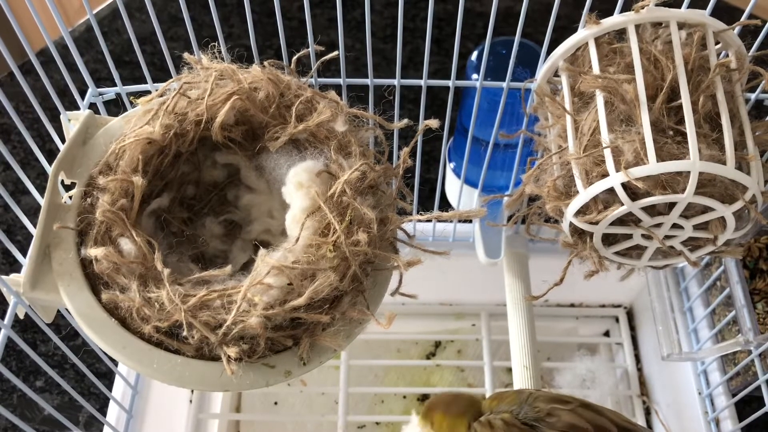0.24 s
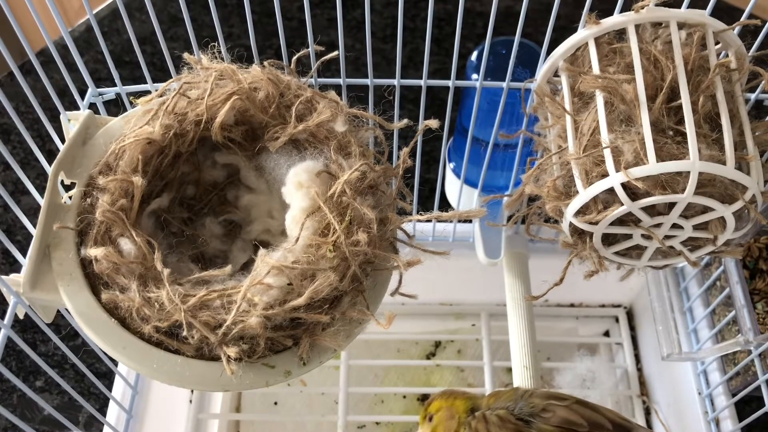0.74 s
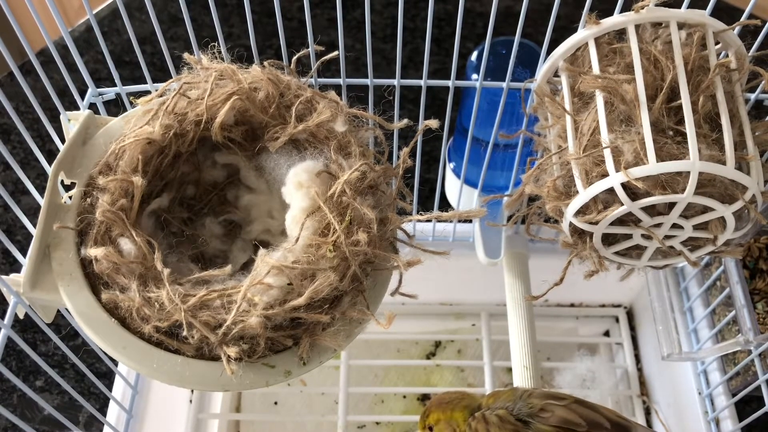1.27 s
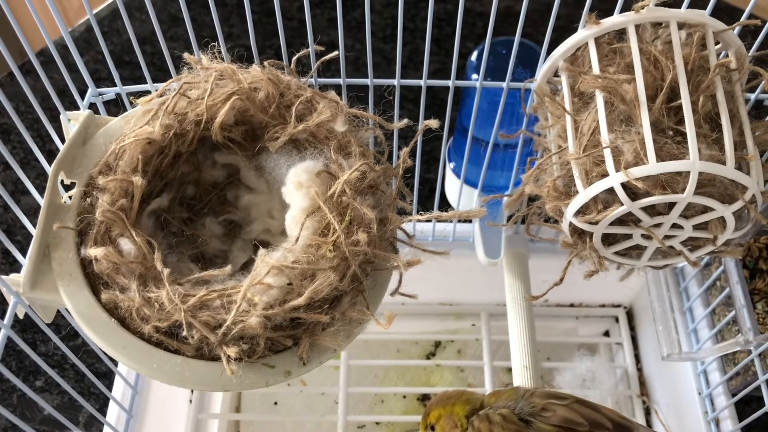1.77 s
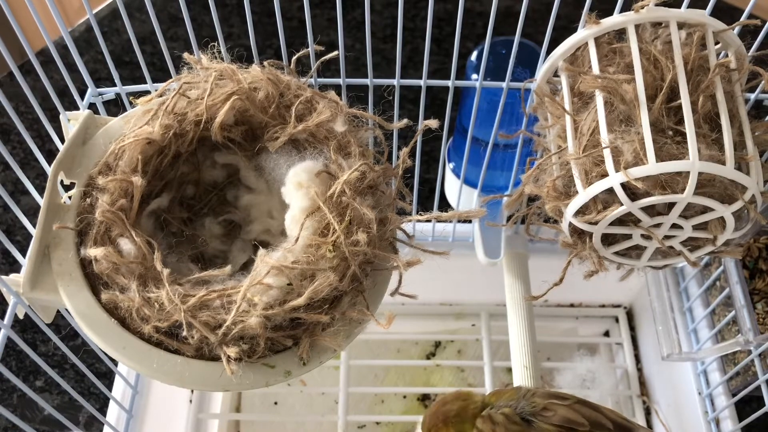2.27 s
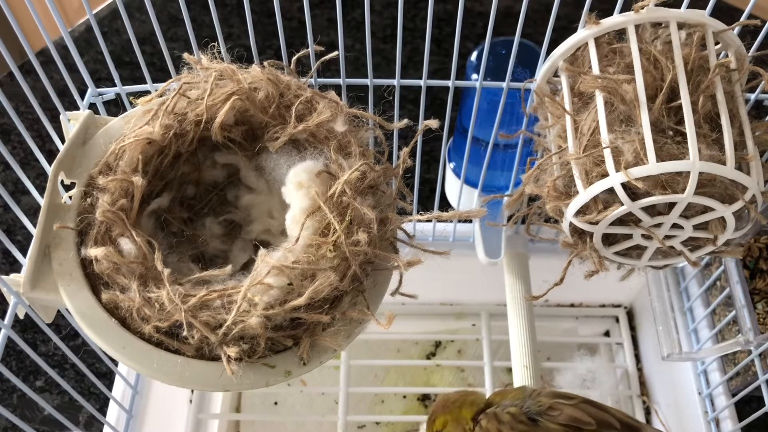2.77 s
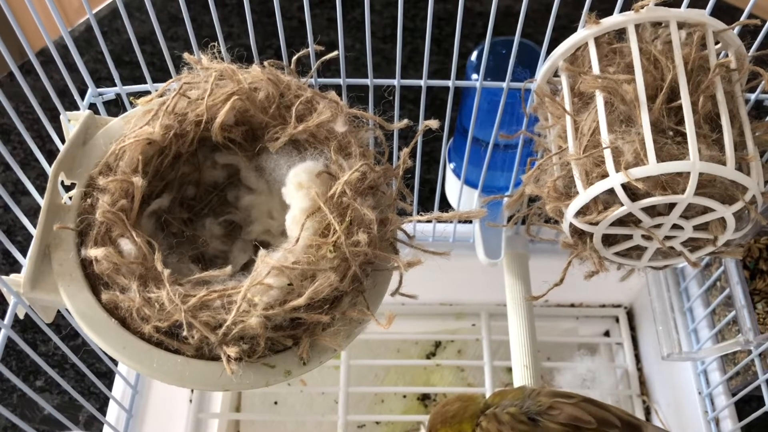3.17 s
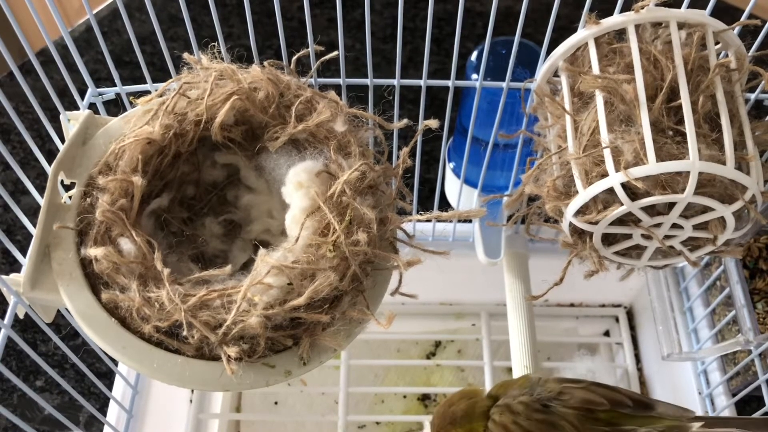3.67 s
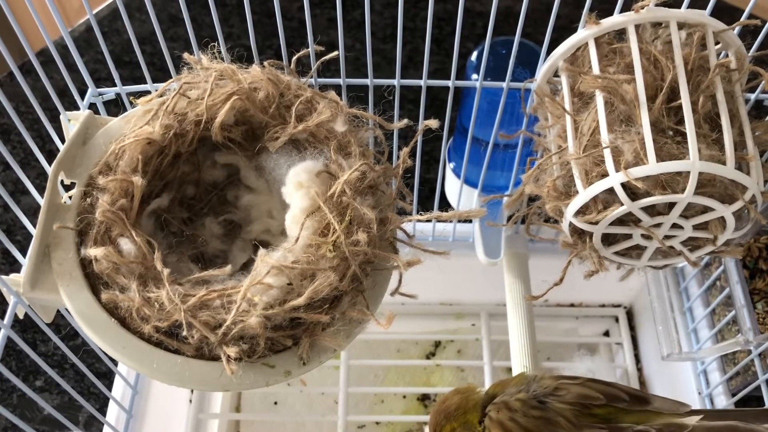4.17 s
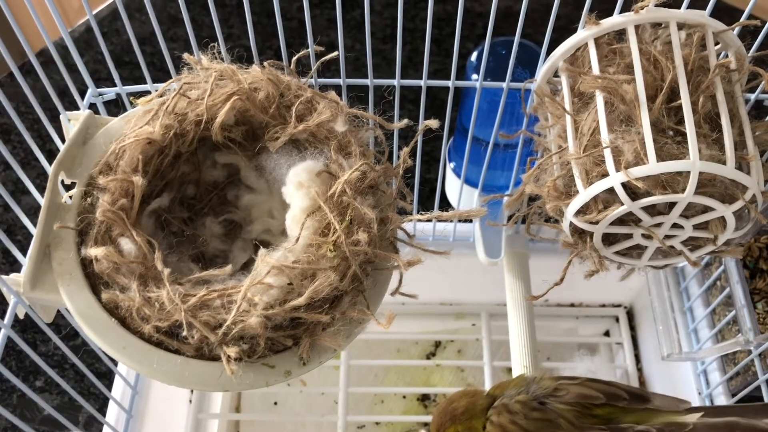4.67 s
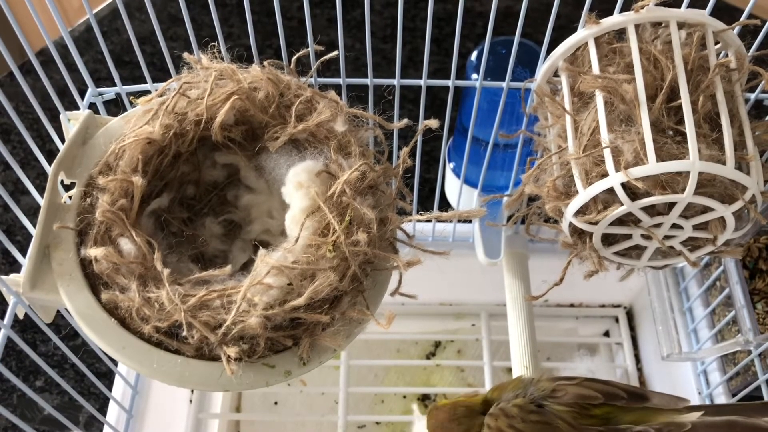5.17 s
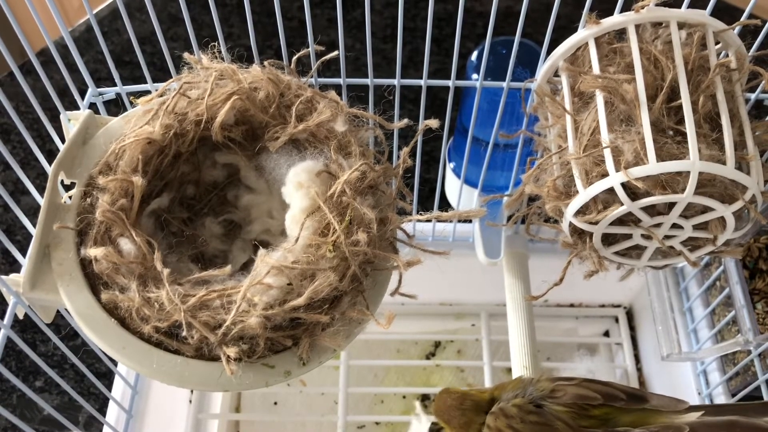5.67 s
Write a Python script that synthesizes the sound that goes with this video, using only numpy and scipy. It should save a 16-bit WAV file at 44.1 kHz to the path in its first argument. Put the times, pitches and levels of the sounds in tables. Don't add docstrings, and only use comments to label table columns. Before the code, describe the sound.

A small caged bird raps out two runs of sharp dry clicks close by, then hops with cage knocks, wire rings and claw scrapes.

```python
import sys
import numpy as np
from scipy import signal
from scipy.fft import rfft, irfft
from scipy.io import wavfile

SR = 44100
rng = np.random.default_rng(int(sys.argv[2]) if len(sys.argv) > 2 else 0)


def boost(x):
    u = np.asarray(x, float) / 20
    return 10 ** u


def to_wav(s):
    ch = np.atleast_2d(s).T
    pcm = np.round(np.clip(ch, -1, 1) * 32767)
    wavfile.write(sys.argv[1], SR, pcm.astype(np.int16))


N = 261513
TIME_S = np.arange(N) / SR

# pitch_hz, level_db, t60_s; the lowest stays unheard
CAGE_BODY = [(135, -2, .12), (470, 0, 0.14), (500.6, -0.5, 0.1), (613, -10, 0.057), (801.4, -6.5, 0.17),
             (887, -9, 0.083), (1040, -13, 0.05), (1145, -6.5, 0.12), (1442, -15, 0.17), (1640, -14, 0.054),
             (1990, -19, .07), (2338, -13.5, 0.07), (2780, -25, 0.17), (3300, -17, 0.063)][1:]
# pitch_hz, level_db, t60_s
LOOSE_WIRE = [(1234, 0.5, 0.19), (1201, -6.5, 0.29), (1256, -12, 0.16), (2446, -15, 0.15), (4020, -3, 0.14),
              (4100, -0.5, 0.16), (5903, -4.5, 0.1), (8340, -6, 0.06), (6040, -4, 0.11), (14200, -7, .06),
              (11200, -12, .06)]


def rms_one(x):
    return x / np.sqrt(np.mean(x ** 2) + 1e-20)


def in_time(rows):
    s, *columns = np.transpose(rows)
    return [np.interp(TIME_S, s, column) for column in columns]


def at_hz(points, hz):
    point_hz, value = np.transpose(points)
    return np.interp(np.log(hz + 1), np.log(point_hz), value)


def coloured(points):
    white = rfft(rng.standard_normal(N))
    hz = np.arange(len(white)) * SR / N
    return rms_one(irfft(white * boost(at_hz(points, hz)), N))


def bandpass(x, order, low_hz, high_hz):
    return signal.sosfilt(signal.butter(order, [low_hz, high_hz], "band", fs=SR, output="sos"), x)


def ring(x, hz, t60):
    r = 10 ** (-3 / (t60 * SR))
    w = 2 * np.pi * hz / SR
    return signal.lfilter([0, np.sin(w)], [1, -2 * r * np.cos(w), r * r], x + 1e-18)


def shaken(modes):
    return sum(boost(db) * rms_one(ring(rng.standard_normal(N), hz, t60)) for hz, db, t60 in modes)


def add(track, s, sound):
    i = round(s * SR)
    track[i:i + len(sound)] += sound[:N - i]


def swells(rows, rise_s, fall_db_per_s, rest_db=-120):
    t = np.arange(0, N + 16, 16) / SR
    power = boost(rest_db) ** 2
    for s, db, hold_s in rows:
        rise = np.clip((t - s) / rise_s, 0, 1)
        fall_s = np.maximum(t - s - rise_s - hold_s, 0)
        power = power + (rise * boost(db - fall_db_per_s * fall_s)) ** 2
    return np.interp(TIME_S, t, np.sqrt(power))


def held_tones(rows, rise_s, fall_db_per_s, rough):
    white, width_hz = rng.standard_normal(N), 32
    out = np.zeros(N)
    for s, db, hold_s, hz in rows:
        tone = np.sqrt(2) * np.sin(2 * np.pi * hz * TIME_S)
        tone += rough * rms_one(ring(white, hz, 2.2 / width_hz))
        out += swells([(s, db, hold_s)], rise_s, fall_db_per_s) * tone
    return out


def hum_line(hz, width_hz):
    return rms_one(ring(rng.standard_normal(N + SR), hz, 2.2 / width_hz)[SR:])


def background():
    # pitch_hz, level_db per Hz
    noise_floor = [(44, -40), (54, 1), (80, -10.5), (150, -15), (250, -4.5), (420, -8.5), (700, -15.5),
                   (1100, -25), (1500, -24.5), (2500, -33), (3500, -30), (8000, -34.5), (15780, -38.5)]
    # pitch_hz, level_db, width_hz; the first is a pure tone whose third column is sway_rad
    hum_lines = [(59.6, -80.5, 0.53), (467, -74, 7.9), (585, -81, 2.5), (689.4, -76.5, 16), (893, -86.5, 8),
                 (3600, -86, 200)]
    # start_s, level_db, hold_s
    surges = [(.7, -59.5, 0.1), (2.28, -59.5, 0.095), (3.34, -60, .02), (3.49, -53.5, 0.12),
              (5.1, -63, .05)]
    # start_s, level_db, hold_s
    passes = [(.3, -59, 0.045), (.95, -59, 0.084), (1.15, -55.5, 0.2), (2.1, -53.5, 0.02),
              (2.55, -56, 0.13), (3.3, -54.5, 0.038), (3.9, -60, 0.038), (5.2, -60, 0.087)]
    rise_s, fall_db_per_s = 0.053, 27
    hum = sum(boost(db) * hum_line(hz, width_hz) for hz, db, width_hz in hum_lines[1:])
    labour = swells(surges, rise_s, fall_db_per_s, rest_db=-63)
    near = swells(passes, rise_s, fall_db_per_s, rest_db=-67)
    steady = 0.96 * np.sin(2 * np.pi * 239.5 * TIME_S) + 0.23 * hum_line(245.0, 19.0)
    hum += boost(-0.5) * labour * steady
    hum += boost(-8.5) * near * hum_line(320, 81)
    hz, db, sway_rad = hum_lines[0]
    sway = sway_rad * coloured([(1, -8), (3, -15.0), (8, -60.5)])
    motor = np.sqrt(2) * boost(db) * np.sin(2 * np.pi * hz * TIME_S + sway)
    sway = 0.71 * coloured([(1, -12), (3, -10), (8, -60.5)])
    motor += np.sqrt(2) * boost(-66.5) * np.sin(2 * np.pi * 57.1 * TIME_S + sway)
    return motor + hum + boost(-65) * coloured(noise_floor)


def engine():
    # time_s, firing_hz, level_db
    speed = [(1.6, 55.9, -86), (2.1, 64.4, -72), (2.8, 72.7, -72), (3.3, 77.16, -68), (3.65, 79.7, -74),
             (4.05, 84.8, -75.5), (4.2, 75.9, -83), (4.4, 60.2, -82), (4.6, 57, -88)]
    # multiple of the firing rate, level_db, heard_from_s
    orders = [(1, 2, 1.2), (1.5, 1.5, 2.66), (3, 5.5, 3.8)]
    hz, db = in_time(speed)
    turn = 2 * np.pi * np.cumsum(hz) / SR
    out = np.zeros(N)
    for multiple, order_db, from_s in orders:
        fade_in = np.clip((TIME_S - from_s) / 0.14, 0, 1)
        out += boost(order_db) * fade_in * np.sqrt(2) * np.sin(multiple * turn)
    return boost(db) * out


def air_modes():
    # start_s, level_db, hold_s, pitch_hz
    woken = [(.72, -65, .1, 264), (1.04, -64.5, 0.043, 297), (1.21, -64, 0.18, 329),
             (1.284, -67.5, 0.086, 380), (1.44, -64.5, 0.076, 381), (1.296, -69.5, 0.057, 437),
             (1.397, -74, 0.1, 520)]
    return held_tones(woken, rise_s=0.023, fall_db_per_s=150, rough=0)


def trembles():
    # start_s, level_db, hold_s, pitch_hz
    grips = [(4.497, -61, 0.027, 1150), (4.5, -64, .04, 1100), (4.541, -52.5, 0.046, 1236),
             (4.59, -61, .02, 1170), (4.63, -63, 0.047, 1220), (4.5, -64, 0.064, 990),
             (4.5, -65, 0.068, 872), (4.51, -65, 0.056, 673), (4.55, -60, 0.042, 480),
             (4.702, -51.5, 0.041, 510), (4.705, -61, 0.031, 468), (4.72, -62, 0.076, 802),
             (4.82, -58.5, .02, 1145), (4.86, -68, .04, 1236), (4.832, -54, 0.018, 468),
             (4.93, -59.5, 0.027, 480), (5.09, -57.5, 0.057, 140), (5.06, -62, .04, 800),
             (5.545, -63, .03, 1236), (4.885, -64.5, 0.023, 1430), (4.72, -63, .06, 125),
             (4.84, -55, .02, 140), (4.51, -56, .02, 125), (4.89, -56.5, 0.02, 810),
             (5.036, -52, 0.031, 480), (5.6, -64, 0.027, 512), (5.08, -60.5, .02, 1500),
             (5.1, -70, .04, 2400), (5.175, -63.5, 0.043, 1240), (3.4, -67, 0.011, 1100),
             (3.105, -59, .008, 1200), (3.13, -66, 0.015, 1250), (2.238, -57.5, 0.0085, 470)]
    return held_tones(grips, rise_s=0.0017, fall_db_per_s=498, rough=0.46)


def squeaks():
    # start_s, level_db, pitch_hz, t60_s
    thin_wires = [
        (.44, -72.5, 1690, 0.51),
        (0.951, -68.5, 1715, 0.15),
        (0.961, -69.5, 963, 0.66),
    ]
    out, t = np.zeros(N), np.arange(SR // 2) / SR
    for s, db, hz, t60 in thin_wires:
        tone = np.sin(2 * np.pi * hz * t) + 0.31 * np.sin(4 * np.pi * hz * t)
        add(out, s, boost(db - 20 * t / t60) * np.minimum(t / 0.035, 1) * tone)
    return out


def rustle():
    # start_s, level_db, hold_s
    straw = [
        (.43, -66, 0.12),
    ]
    # start_s, level_db, hold_s
    strokes = [
        (.455, -70.5, 0.08),
    ]
    # pitch_hz, level_db, t60_s
    stroked_wires = [(1650, 2, 0.06), (2700, -8, .04), (3260, 3, .025), (3480, 5, 0.033), (4270, -2, .03),
                     (4600, -2, .03), (5250, -2, .03)]
    rise_s = 0.036
    feathers = coloured([(900, -4), (1700, -7.5), (2300, -14.5), (3300, -10.5), (4500, -14.0),
                         (7000, -24), (12000, -55)])
    out = swells(straw, rise_s, fall_db_per_s=30) * feathers
    return out + swells(strokes, rise_s, fall_db_per_s=300) * rms_one(shaken(stroked_wires))


def perch():
    # pitch_hz, level_db per Hz
    rumble = [(60, -4.5), (110, 10.5), (160, 10), (250, 1.5), (350, -8), (600, -38)]
    # time_s, level_db
    fidget = [(0, -62.5), (.4, -64), (1.2, -58.5), (1.7, -58.5), (1.86, -65), (1.95, -57.5), (2.6, -56),
              (3.1, -54), (3.6, -60), (3.85, -60.5), (4.3, -61), (5.3, -59), (5.93, -59.5)]
    # start_s, rattle_db, rumble_db, hold_s
    jolts = [(0.678, -67, -51, 0.034), (1.908, -73, -49, 0.052), (3.452, -79, -55, 0.042),
             (3.689, -58.5, -51, 0.044), (4.381, -54.5, -51, 0.025), (4.448, -53, -50.5, 0.037),
             (4.496, -48, -50.5, 0.055), (4.715, -44, -41.5, 0.024), (4.827, -50.5, -51, 0.023),
             (4.897, -48.5, -51, 0.016), (5.037, -46.5, -48, 0.076), (5.1, -53, -50.5, 0.067),
             (5.535, -51, -62, 0.015)]
    rise_s, fall_db_per_s = 0.0074, 104
    fidget_db, = in_time(fidget)
    rattle_jolts = swells([(s, db, hold_s) for s, db, _, hold_s in jolts], rise_s, fall_db_per_s)
    rumble_jolts = swells([(s, db, hold_s) for s, _, db, hold_s in jolts], rise_s, fall_db_per_s)
    rattle = rms_one(shaken(CAGE_BODY))
    rattle += 1.29 * coloured([(200, -39), (350, 1.0), (900, -3.0), (2000, -17.5), (3500, -22.0),
                               (6000, -26.5), (10000, -53), (15700, -49)])
    low = np.hypot(boost(fidget_db + 4.5), rumble_jolts) * coloured(rumble)
    return boost(-8.5) * (low + np.hypot(boost(fidget_db), rattle_jolts) * rms_one(rattle))


def brushed_wire():
    # start_s, level_db, hold_s
    brushes = [(.76, -71, 0.12), (1.24, -66, 0.11), (1.49, -65.5, 0.21), (1.93, -74, 0.042),
               (2.62, -66.5, 0.17), (2.82, -67.5, 0.084), (3.05, -65, 0.11), (3.8, -71.5, 0.055),
               (4.49, -53, 0.055), (4.6, -65, 0.051), (4.73, -59, 0.033), (4.85, -56.5, 0.024),
               (5.09, -62, 0.081), (5.18, -61.5, 0.029), (5.54, -59, 0.022)]
    # start_s, level_db, hold_s
    buzzes = [
        (4.495, -66, 0.04),
        (4.54, -70, .04),
        (4.61, -77, .02),
        (4.75, -79, .04),
        (4.82, -68, 0.02),
        (4.855, -76, 0.022),
        (5.1, -73, .03),
    ]
    rise_s = 0.0043
    damped = rms_one(shaken([(hz, db, 0.2 * t60) for hz, db, t60 in LOOSE_WIRE[:4]]))
    out = swells(brushes, rise_s, fall_db_per_s=111) * damped
    upper = np.zeros(N)
    for hz, db, t60 in LOOSE_WIRE[3:]:
        upper += boost(db) * rms_one(ring(shaken([(hz, 0, .15 * t60)]), hz, .12 * t60))
    return out + swells(buzzes, rise_s, fall_db_per_s=220) * rms_one(upper)


def grains(per_s):
    sizes = boost(4 * np.minimum(rng.exponential(1, N), 3.5)) * rng.choice([-1, 1], N) / 2.3
    catches = (rng.random(N) < per_s / SR) * sizes * np.sqrt(SR / per_s)
    catches = signal.sosfilt(signal.butter(8, 15700, fs=SR, output="sos"), catches)
    return bandpass(catches, 1, 900, 5500)


def claw_drags():
    # start_s, level_db, hold_s
    drags = [(3.01, -62, 0.0049), (3.115, -64, 0.0084), (3.235, -63, 0.007), (3.29, -73, 0.0063),
             (4.495, -67, 0.018), (4.73, -66, 0.018), (4.83, -84, 0.044), (4.885, -54, 0.0046),
             (5.03, -49, 0.0055), (5.052, -54.5, 0.008), (5.075, -52, 0.006), (5.092, -59, .002),
             (5.12, -76, 0.044), (5.54, -72, 0.015)]
    # start_s, level_db, hold_s
    scrabble = [
        (2.083, -66, 0.62),
    ]
    out = swells(drags, rise_s=0.00045, fall_db_per_s=460, rest_db=-84) * grains(per_s=1600)
    scrabbling = swells(scrabble, rise_s=0.673, fall_db_per_s=160)
    out += scrabbling * grains(per_s=300)
    bumps = scrabbling * grains(per_s=120)
    return out + boost(-23.5) * sum(boost(db) * ring(bumps, hz, 0.2 * t60) for hz, db, t60 in CAGE_BODY)


def shuffle():
    return perch() + boost(-3.5) * brushed_wire() + boost(6.5) * claw_drags() + rustle()


def knocks():
    # start_s, peak_db, wire_ring_db, upper_wire_db
    hops = [(1.9, -52, -15, -30), (2.24, -58.5, -32, -28), (2.64, -50, -35, -30), (3.055, -60, 7, -24),
            (3.12, -54.5, 0, -33), (4.39, -55, -8, -15), (4.495, -52, 2, -10), (4.541, -45.5, 0.5, -17),
            (4.701, -37.5, -25, -27), (4.724, -47, -14, -27), (4.737, -47, -12, -24), (4.82, -50, 1, -22),
            (4.845, -47, -16, -22), (4.888, -44, -18, -28), (5.033, -40.5, -8, -26),
            (5.055, -46.5, -5, -28), (5.078, -44, -12, -30), (5.177, -57, -2, -32), (5.541, -52, 0, -26)]
    # pitch_hz, level_db, t60_s
    stand = [(118.2, -6, 0.3), (157, -12, 0.16), (139.5, -5.5, 0.24)]
    out, t = np.zeros(N), np.arange(900) / SR
    modes = [(mode, 0) for mode in CAGE_BODY + stand]
    modes += [(mode, 2 if mode[0] > 3000 else 1) for mode in LOOSE_WIRE]
    chance = rng.standard_normal((len(hops), len(modes), len(t) + 1))
    for k, ((hz, mode_db, t60), part) in enumerate(modes):
        push = np.zeros(N)
        for (s, db, wire_db, upper_db), noise in zip(hops, chance):
            rough = noise[k, 1:] * np.exp(-t / .005)
            reach = np.abs(rough @ np.exp(-2j * np.pi * hz * t)) + 2
            level_db = db + mode_db + (0, wire_db, upper_db)[part] + 2.5 * noise[k, 0] - 6
            add(push, s, boost(level_db) * rough / reach)
        out += ring(push, hz, t60)
    return out


def ticks():
    # start_s, peak_db, pitch_hz
    claw_ticks = [(2.227, -41.5, 4620), (2.2373, -38, 7060), (2.3268, -39, 7930), (2.335, -42, 8000),
                  (2.4286, -44, 3150), (2.4367, -46, 5900), (2.5366, -38.5, 6660), (2.6396, -35.5, 5570),
                  (2.6823, -53, 12100), (2.797, -37, 5100), (2.9053, -47, 6750), (3.0136, -51, 3640),
                  (3.1188, -40, 6030), (3.1682, -48, 8510), (3.294, -54, 2480), (4.3925, -45.5, 11300),
                  (4.497, -42, 3120), (4.6994, -33.5, 3300), (4.7236, -36, 4500), (4.8851, -34, 5560),
                  (5.03, -38.5, 2650), (5.0791, -35.5, 4020), (5.092, -40, 4800), (4.7, -46, 7200),
                  (4.886, -42, 2250), (5.068, -49, 3980), (5.031, -40, 4500), (5.048, -52, 6850),
                  (4.739, -45, 4000), (4.54, -53, 4970), (5.1884, -42, 4260), (5.292, -48.5, 4380),
                  (5.54, -51, 2800),
                  (1.395, -53, 6000), (1.6205, -46, 7000), (2.048, -40, 7000), (2.142, -44, 6000),
                 (2.2749, -43.5, 6000), (2.2876, -38, 8000), (2.3864, -39, 6000), (2.478, -48, 5000),
                 (2.6931, -43, 7000), (3.057, -60, 5000), (4.989, -60, 13500), (5.1594, -63, 13400),
                 (5.2629, -65, 13000),
                  (2.1912, -42, 5720), (2.3785, -52, 2600), (2.4879, -41, 2820), (2.525, -45, 1720),
                 (2.6925, -43, 2100), (2.786, -52, 5360), (2.8947, -49, 2470), (3.0056, -56, 5000),
                 (3.051, -56, 1915), (3.0615, -49, 8000), (3.123, -40, 3000), (3.1691, -68, 1800),
                 (3.24, -51, 2500), (3.298, -47, 6000), (3.392, -64, 11990), (3.299, -45, 1900),
                 (3.107, -45, 2500), (3.0, -54, 5000), (2.63, -49, 1500), (2.683, -48, 2000),
                 (2.337, -46, 4500), (2.438, -55, 2500), (3.255, -54, 3000), (3.35, -52, 2200),
                 (4.75, -52, 2800), (4.744, -50, 2300), (4.822, -52, 3000), (4.9, -52, 5000),
                 (4.925, -56, 2600), (5.043, -46, 1500), (5.083, -42, 1500), (5.105, -54, 4000),
                 (5.118, -53, 2500), (4.425, -53, 8000), (4.918, -57, 7000), (5.036, -46, 4000),
                 (5.056, -47, 4000), (5.062, -45, 8000), (5.074, -39, 4940), (5.085, -44, 9000),
                 (5.221, -60, 11000), (5.546, -59, 5000)]
    out, ms = np.zeros(N), np.arange(400) / SR * 1000
    for s, db, hz in claw_ticks:
        puff = rng.standard_normal(len(ms)) * np.exp(-ms / .9)
        band = bandpass(puff, 2, hz / 1.9, min(hz * 1.9, 15700))
        add(out, s + .001, boost(db - 1) * band / np.abs(band).max())
    return out


def raps():
    # start_s, peak_db, top_db above 9 kHz
    short_run = [
        (0.5243, -9, 1),
        (0.635, -9.5, 0.5),
        (0.7481, -9, 0.5),
        (0.8684, -11, 0.5),
        (0.977, -15, -0.5),
        (0.9991, -11.5, 1.5),
        (1.1276, -10.5, 0.5),
    ]
    # start_s, peak_db, top_db above 9 kHz
    long_run = [(1.5352, -8.5, 2), (1.6388, -9, 2.5), (1.7453, -11, 2.5), (1.855, -9.5, 2.5),
                (1.9629, -8, 2), (2.0742, -7.5, 3), (2.1643, -10.5, -6.5), (2.2983, -8, 3.5),
                (2.3906, -7, 2.5), (2.4924, -9, 3), (2.603, -8, 2.5), (2.7104, -7, 2.5), (2.829, -8.5, 2),
                (2.9516, -8.5, 2.5), (3.0763, -6.5, 2), (3.1993, -8.5, 3), (3.3306, -6.5, 2),
                (3.4438, -7, 1.5), (3.5559, -6.5, 2), (3.6549, -6, 1.5), (3.7726, -6.5, 1.5),
                (3.8947, -7.5, 2), (4.0099, -8, 1.5), (4.12, -5.5, 0), (4.24, -7.5, 1.5)]
    # pitch_hz, level_db
    rap_colour = [(600, -74), (1500, -21), (2350, -20), (3000, -14.5), (4000, -4), (5500, -4), (6600, -3.5),
                  (7300, -8.5), (8300, 2), (9700, 2), (10800, -4), (11800, 1.5), (13500, -1.5),
                  (14700, -1.5), (15400, -4.5)]
    # pitch_hz, level_db
    rap_top = [(15400, 0), (16000, -4), (16450, -6), (16800, -34), (17100, -42), (17400, -70)]
    # pitch_hz, level_db
    radiated = [(800, -36), (2000, -14), (3500, -6), (6000, -4), (9000, -5.5), (13000, -6), (15200, -5)]
    # lag_ms, signed share
    cage_parts = [(.335, .17), (.65, -.1), (.78, .1), (1.0, -.08), (1.14, .08), (1.39, -.12), (1.53, .09),
                  (1.99, .07)]
    # time_s, close face share, mirror share, gleam_db of a wire near 8 kHz
    bird_place = [(.5, 0.3, 0.22, -11), (1.2, 0.18, 0.28, -8), (1.8, 0.15, 0.31, -2.5),
                  (2.6, 0.14, 0.33, -1.5), (3.3, 0.1, 0.42, 0.5), (4.3, 0.2, 0.45, 4.5)]
    # time_s, lag_ms
    mirror_way = [(.5, .477), (1.2, .487), (1.86, .502), (2.1, .522), (2.6, .525), (2.9, .514), (3.2, .516),
                  (3.44, .55), (3.7, .543), (4.3, .545)]
    out, bare, size = np.zeros(N), np.zeros(N), 512
    hz = np.arange(size // 2 + 1) * SR / size
    ms = np.arange(size) / SR * 1000

    def late(lag_ms):
        return np.exp(-2j * np.pi * hz * lag_ms / 1000)

    wires = rng.standard_normal(size)
    dying = np.exp(-ms / 1.3) * (ms > .25)
    fade_out = np.sin(np.clip((11.5 - ms) / 6, 0, 1) * np.pi / 2) ** 2
    onset = np.clip((ms - .75) / .3, 0, 1) ** 2 * fade_out
    flexing = np.exp(-2j * np.pi * 65e-6 * np.maximum(hz - 5600, 0))
    thin = 1.15 * hz / np.hypot(hz, 5000)
    treble = np.clip(np.log2((hz + 1) / 6500), 0, 1)
    gleam = np.exp(-((hz - 8000) / 380) ** 2)
    place_s, *place = np.transpose(bird_place)
    for s, db, top_db in short_run + long_run:
        close, mirror, gleam_db = (np.interp(s, place_s, column) for column in place)
        mirror_ms = np.interp(s, *np.transpose(mirror_way))
        mirror_jitter, time_jitter = rng.standard_normal(2)
        scatter = .016 * wires + .045 * rng.standard_normal(size)
        paths = 1 + close * late(.14)
        paths += mirror * late(mirror_ms - .065 + .003 * mirror_jitter) * flexing
        paths += thin * sum(share * late(lag_ms + mirror_ms - .55) for lag_ms, share in cage_parts)
        paths += thin * rfft(scatter * dying)
        pulse_db = at_hz(rap_colour, hz) + at_hz(rap_top, hz) + top_db * treble + gleam_db * gleam
        pulse = boost(pulse_db) * np.exp(1.82j)
        direct = pulse * late(1.2 + .01 * time_jitter)
        crack = onset * irfft(direct * paths)
        add(out, s, boost(db - 5.0) * crack / np.abs(crack).max())
        sent = boost(at_hz(radiated, hz) + top_db * (hz > 9000)) * late(1.09)
        add(bare, s, boost(db - 5.5) * irfft(sent) * 2)
    return out, bare


def room(x, wet_db):
    # lag_ms, level_db
    wall_echoes = [(8.3, -35), (10.4, -32), (12.5, -36), (17.2, -37)]
    # pitch_hz, t60_s
    room_decay = [(300, 0.36), (2000, 0.16), (6000, 0.48), (15000, 0.3)]
    t, tail = np.arange(int(.7 * SR)) / SR, 0
    band_hz = 150 * 2 ** np.arange(0, 7.1, .5)
    for low, high in zip(band_hz, band_hz[1:]):
        band = bandpass(rng.standard_normal(len(t)), 2, low, high)
        tail = tail + band * boost(-60 * t / at_hz(room_decay, np.sqrt(low * high)))
    tail = boost(wet_db) * tail * np.clip((t - .001) / .01, 0, 1)
    for ms, db in wall_echoes:
        add(tail, ms / 1000, [boost(db)])
    return signal.fftconvolve(x, tail)[:N]


def scene():
    sharp, bare = raps()
    dull = ticks() + knocks()
    rest = room(bare, wet_db=-42.0) + dull + room(dull, wet_db=-42.5)
    rest += shuffle() + squeaks() + air_modes() + trembles() + engine() + background()
    spectrum = rfft(rest)
    hz = np.arange(len(spectrum)) * SR / N
    rest = irfft(spectrum * np.clip((15830 - hz) / 60, 0, 1), N)
    return (sharp + rest)[None]


def band_limit(x):
    return signal.sosfilt(signal.butter(12, 17200, fs=SR, output="sos"), x)


def record(dry):
    bass = signal.butter(6, 47, "high", fs=SR, output="sos")
    top = signal.cheby2(16, 35, 17350, fs=SR, output="sos")
    mix = signal.sosfiltfilt(top, signal.sosfilt(bass, dry))
    return band_limit(mix)


dry = scene()
out = record(dry)
to_wav(out)
```